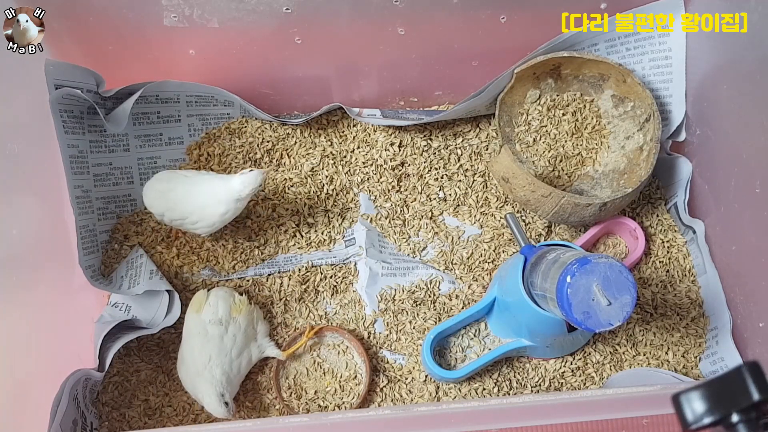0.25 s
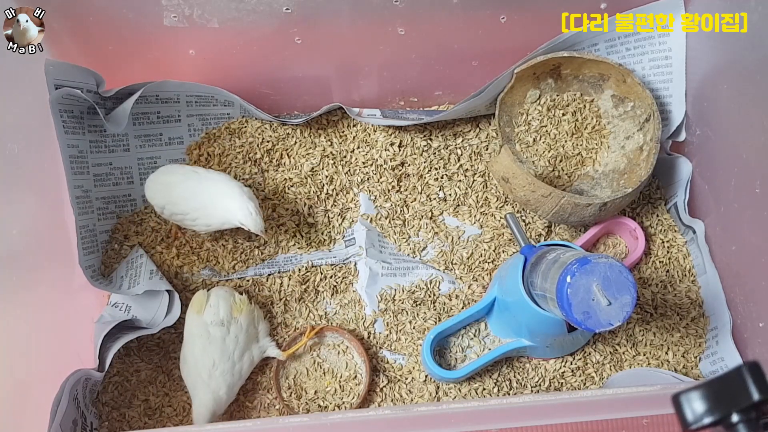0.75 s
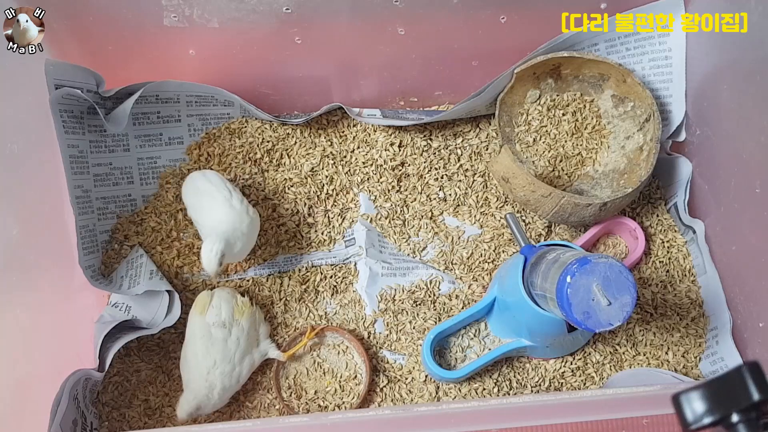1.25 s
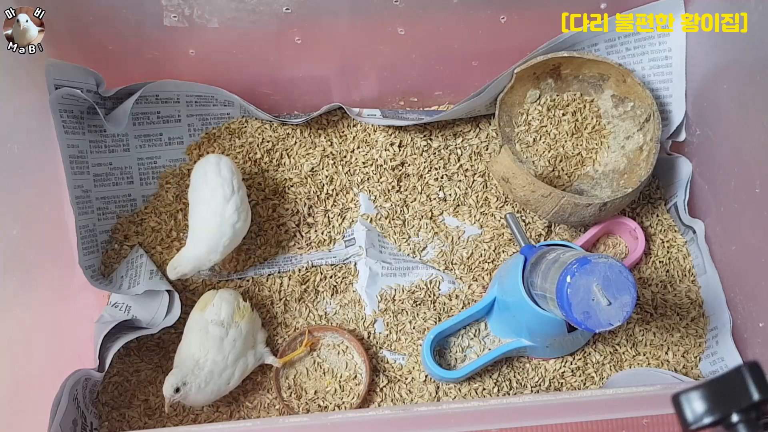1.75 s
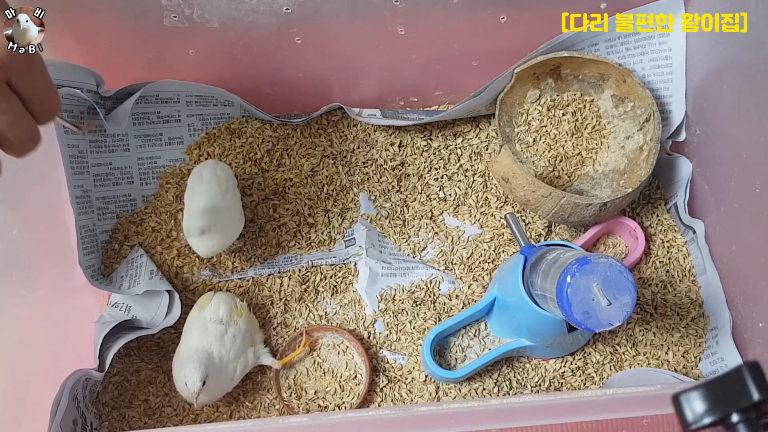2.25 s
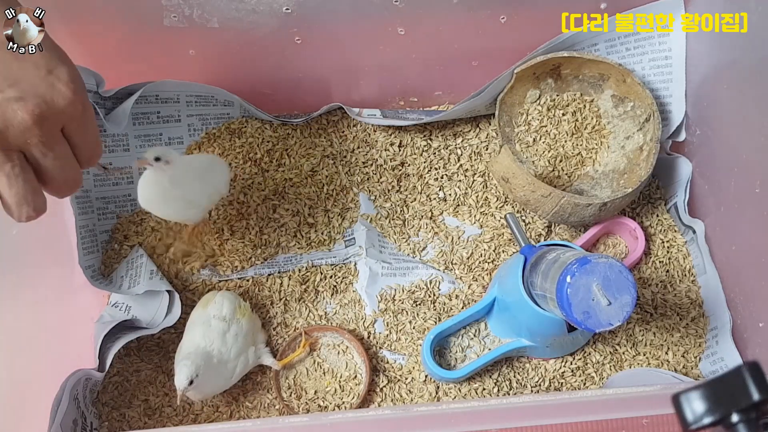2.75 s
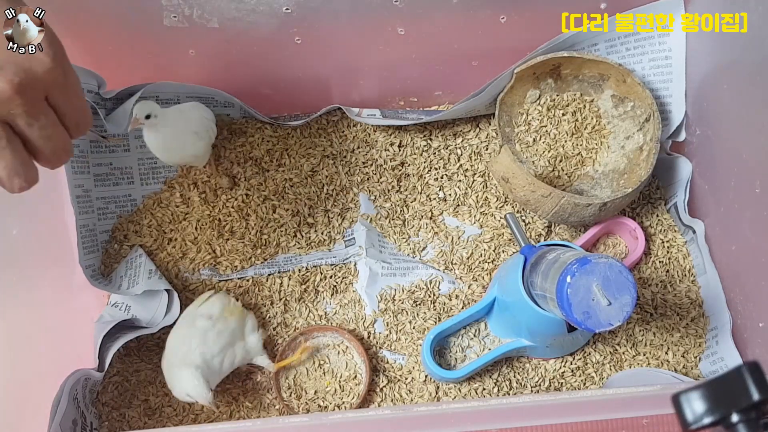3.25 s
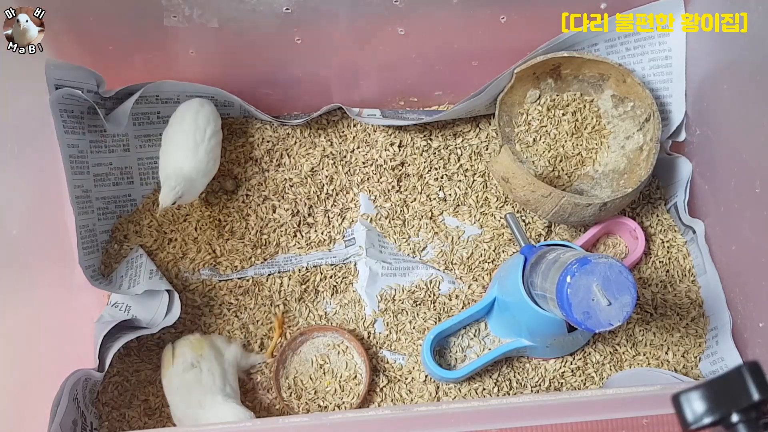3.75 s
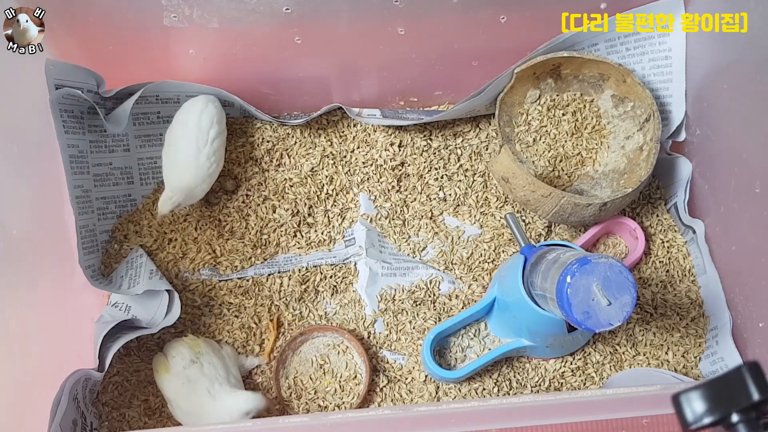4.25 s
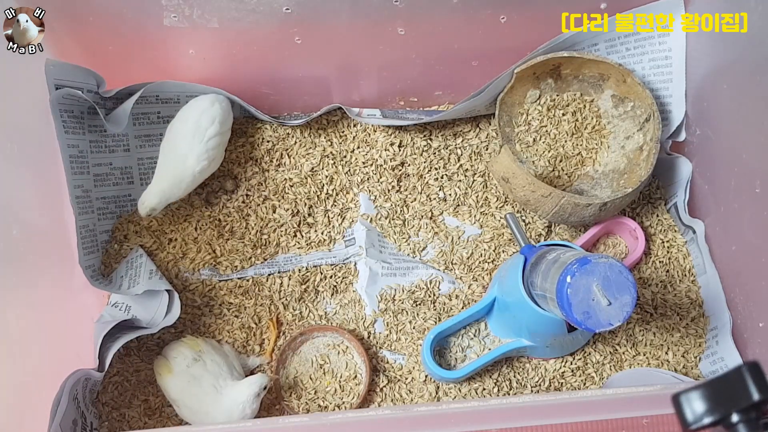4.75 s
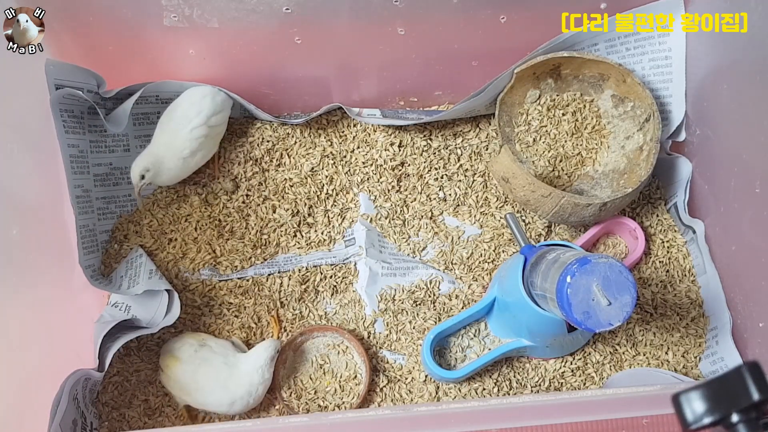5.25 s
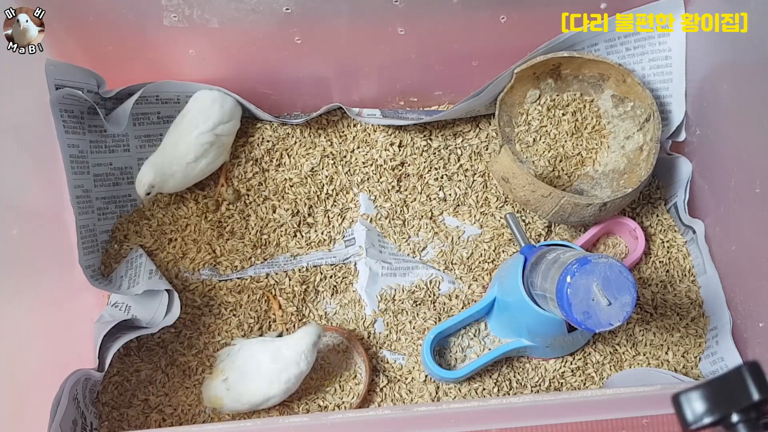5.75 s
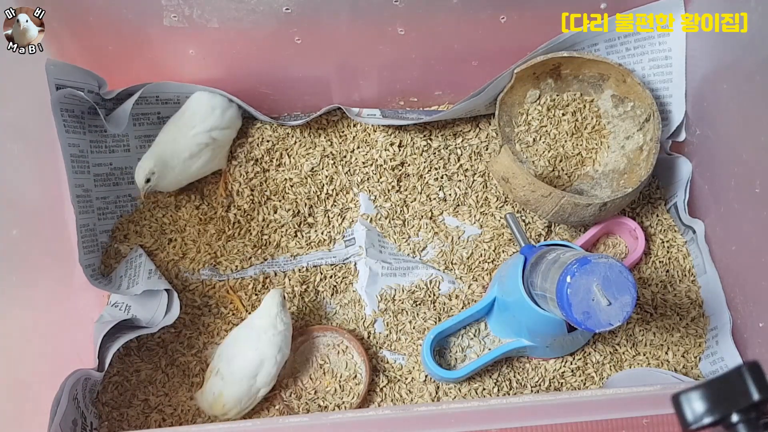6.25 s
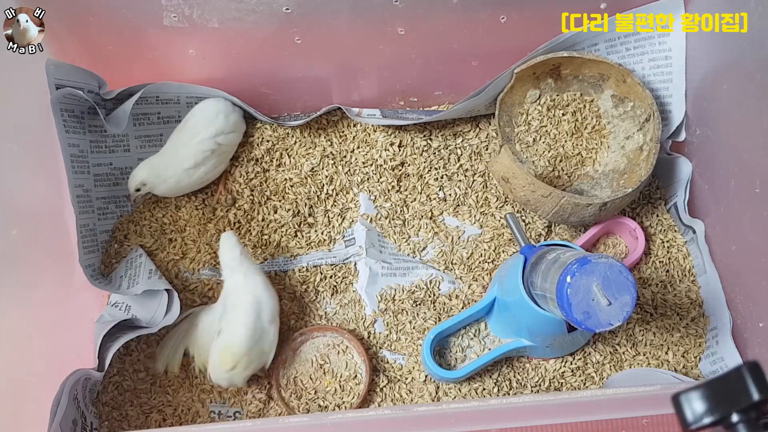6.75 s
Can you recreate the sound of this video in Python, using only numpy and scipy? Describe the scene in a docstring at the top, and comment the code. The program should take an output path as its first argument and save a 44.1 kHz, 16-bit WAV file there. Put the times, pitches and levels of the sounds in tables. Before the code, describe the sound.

In a small room, two motors hum with a quick low throb under rumble and soft hiss, while distant birds peep and twitter. Two quails in a husk-lined plastic tub first step lightly, then scratch hard around three seconds. After a lull with soft chirp-and-low-note calls, shorter scratching follows near five seconds and the strongest knocks near six. Close stereo pickup from above, slightly left.

```python
"""Two quails step and scratch in husks spread on newspaper in a plastic tub, heard from above in a small room.
Throughout, two motors hum and beat under rumble and hiss while far birds peep and twitter (gliding sines).
Light steps crackle from 0.2 s; soft two-part calls (chirp, then low note) come from 1.6 s, mostly after 3.4 s.
Bursts of scratching follow near 2.8-3.5, 4.8-5.4 and 5.9-7 s: random snaps for the husks, and for claws
that reach the paper, knocks that ring the modes of the tub floor."""
import sys
import numpy as np
from scipy import signal
from scipy.fft import rfft, irfft
from scipy.io import wavfile

SR = 44100
rng = np.random.default_rng(int(sys.argv[2]) if len(sys.argv) > 2 else 0)


def digitize_waveform(pressure):
    """Quantize a signal to 16-bit integers and store it at the path in sys.argv[1].

    Rows of a 2-D input are taken as channels; values are limited to [-1, 1].
    """
    field = np.atleast_2d(pressure).T
    bounded = np.clip(field, -1, 1)
    quanta = np.round(bounded * 32767).astype(np.int16)
    wavfile.write(sys.argv[1], SR, quanta)


N = 308700
TIME_S = np.arange(N) / SR


def amp(db):
    """Decibels to gain."""
    return 10 ** (np.asarray(db) / 20)


def evened(x):
    """Scales to rms 1."""
    return x / np.sqrt(np.mean(x ** 2) + 1e-20)


def read(points, hz):
    """Reads a spectrum on a log-frequency axis."""
    f, value = np.transpose(points)
    return np.interp(np.log(hz + 1), np.log(f + 1), value)


def level_curve(points):
    """Gain over time from (time [s], level [dB]) points."""
    return amp(np.interp(TIME_S, *np.transpose(points)))


def add(mix, start_s, sound):
    """Mixes a sound in at start_s."""
    part = mix[max(round(start_s * SR), 0):][:len(sound)]
    part += sound[:len(part)]


def wander(hz):
    """Low-passed noise of rms 1, up to about hz changes a second."""
    f = np.fft.rfftfreq(N, 1 / SR)
    lowpass = 1 / (1 + (f / hz) ** 2) ** 2
    return evened(irfft(rfft(rng.standard_normal(N)) * lowpass, N))


def panned(x, left_db):
    """Tips a stereo pair to the left."""
    return x * amp([[left_db / 2], [-left_db / 2]])


def click(colour, size=2048):
    """Minimum-phase click with this spectrum, energy 1."""
    hz = abs(np.fft.fftfreq(size, 1 / SR))
    log_gain = np.log(amp(read(colour, hz)))
    min_phase = np.exp(np.conj(signal.hilbert(log_gain)))
    h = np.fft.ifft(min_phase).real[:size // 2]
    return h / np.linalg.norm(h)


def echoes(t60_s, size=20000):
    """Sparse reflections, different at each microphone, dying away; energy 1."""
    t = np.arange(size) / SR
    sparse = rng.random((2, size)) < .1
    taps = rng.standard_normal((2, size)) * sparse * (t > .001)
    taps = taps * amp(-60 * t / t60_s)
    return taps / np.linalg.norm(taps, axis=1, keepdims=True)


def enclosure(x, walls_db, walls_t60_s, room_db, room_t60_s, right_lag_samples=6):
    """Direct sound, late at the right microphone, then reflections of the tub walls and the room."""
    h = amp(walls_db) * echoes(walls_t60_s) + amp(room_db) * echoes(room_t60_s)
    h[0, 0] = h[1, right_lag_samples] = 1
    return signal.oaconvolve(x[None], h / np.linalg.norm(h[0]), axes=1)[:, :N]


def whistle(length_s, pitches_hz, waver=0.025, flutter_db=2.0):
    """Near-sine of rms 1 gliding through the pitches, a little unsteady in pitch and strength."""
    u = np.linspace(0, 1, int(length_s * SR))
    knots = np.linspace(0, 1, 20)
    shake, flutter = (np.interp(u, knots, row) for row in rng.standard_normal((2, 20)))
    hz = np.interp(u, np.linspace(0, 1, len(pitches_hz)), pitches_hz) * (1 + waver * shake)
    tone = np.sin(2 * np.pi * np.cumsum(hz) / SR)
    return evened(tone * amp(flutter_db * flutter) * signal.windows.tukey(len(u), .4))


# rumble density before modes and swell: (frequency [Hz], level [dB per Hz])
RUMBLE = [(25, -96), (39, -100), (52, -77.5), (63, -90), (77, -74), (98, -88.5), (135, -88), (200, -87.5),
          (250, -83.5), (350, -88), (480, -92.5), (1000, -101), (1700, -118)]
# low room resonances: (centre [Hz], boost [dB])
ROOM_MODES = [(161, 9.5), (236, 5), (295, 5.5), (360, 10)]
# left-right likeness of rumble: (frequency [Hz], likeness [-1..1])
LIKENESS = [(70, 0.99), (130, 0.78), (290, 0.92), (640, 0.52), (1400, 0.081)]
# deep-bass gain: (time [s], level [dB])
SWELL = [(0, 9.5), (1.15, 11), (1.45, 3.5), (4.9, 8), (5.55, 10.5), (6.4, 10), (7, 1.5)]
# hiss density: (frequency [Hz], level [dB per Hz])
HISS = [(300, -112), (1100, -100.5), (1700, -109), (2200, -107), (2800, -102), (3800, -102.7),
        (5200, -101.3), (6800, -104), (8400, -100), (10500, -103), (12500, -103.5), (16000, -108.5)]


def room_air():
    """Fan rumble, coloured by room modes and swelling in the deep bass, under a diffuse hiss."""
    hz = np.fft.rfftfreq(N, 1 / SR)
    # white spectra at 0 dB per Hz
    shared, apart, hiss_l, hiss_r = rfft(rng.standard_normal((4, N))) * np.sqrt(SR / 2)
    same = np.clip(read(LIKENESS, hz), -1, 1)
    modes_db = sum(db / (1 + ((hz - centre_hz) / 7) ** 2) for centre_hz, db in ROOM_MODES)
    pair = np.array([shared, same * shared + np.sqrt(1 - same ** 2) * apart])
    fan = pair * amp(read(RUMBLE, hz) + modes_db)
    deep = 1 / (1 + (hz / 105) ** 6)
    rumble = irfft(fan * (1 - deep), N) + irfft(fan * deep, N) * level_curve(SWELL)
    hiss = irfft(np.array([hiss_l, hiss_r]) * amp(read(HISS, hz)), N)
    return panned(rumble, left_db=2.5) + hiss


MOTOR_HZ, BEAT_HZ, TOGETHER_S = 79.61, 4.385, 2.634  # faster motor; beat rate; a moment of peak
MOTOR_DB, SLOW_MOTOR_DB = -50, -56  # rms
# mains hum: (frequency [Hz], rms level [dB])
MAINS = [(120, -68)]


def hum():
    """Two motors of nearly equal speed beat over a faint mains hum."""
    slow_phase = np.exp(-2j * np.pi * BEAT_HZ * (TIME_S - TOGETHER_S))
    beat = amp(MOTOR_DB) + amp(SLOW_MOTOR_DB) * slow_phase
    motors = (beat * np.exp(2j * np.pi * (MOTOR_HZ * TIME_S + rng.random()))).real
    mains = sum(amp(db) * np.sin(2 * np.pi * (hz * TIME_S + rng.random())) for hz, db in MAINS)
    return np.sqrt(2) * (motors + mains)


# quick chirps: (time [s], length [s], start [Hz], end [Hz], level [dB])
CHIRPS = [(0.721, .026, 2550, 4000, -64), (0.756, 0.037, 3810, 2270, -61), (2.214, .031, 2900, 4250, -55),
          (2.217, 0.029, 4200, 4150, -56), (2.67, 0.074, 3120, 2410, -67)]
# near-level peeps: (time [s], length [s], pitch [Hz], level [dB])
PEEPS = [(0.021, 0.054, 2593, -63), (0.328, .08, 2540, -69), (0.611, .045, 2570, -64),
         (0.661, 0.072, 2520, -66), (0.615, 0.16, 3950, -72), (0.792, 0.083, 3020, -72),
         (0.908, 0.078, 2230, -65), (1.0, 0.058, 2550, -71), (1.18, 0.056, 2200, -67),
         (1.421, 0.036, 3130, -65), (1.45, 0.054, 2580, -68), (1.539, 0.14, 2185, -65),
         (1.896, 0.081, 3140, -72), (2.26, 0.081, 2444, -66), (2.336, 0.058, 2140, -67),
         (2.426, 0.054, 2200, -63), (2.497, 0.047, 3140, -66), (4.43, 0.043, 2520, -66),
         (4.648, .05, 2125, -67), (5.6, 0.063, 2670, -66), (5.592, .07, 3120, -68),
         (5.696, 0.054, 2445, -69), (5.849, 0.044, 2660, -70.5), (6.452, 0.027, 2680, -69)]
# flock twitter: (time [s], level [dB])
FLOCK = [(0, -75.5), (1.5, -66), (4.1, -72.5), (4.4, -76.5), (5.6, -64)]


def far_birds(count=420):
    """Short falling notes of a flock, mostly by way of the room; peeps and nearer chirps stand out."""
    near, peeps, flock = np.zeros((3, N))
    u = np.linspace(0, 1, 20)
    for s, length_s, start_hz, end_hz, db in CHIRPS:
        bend = u ** 3 if end_hz > start_hz else 1 - (1 - u) ** 2  # lingers at the low end
        add(near, s, amp(db) * whistle(length_s, start_hz + (end_hz - start_hz) * bend))
    for s, length_s, hz, db in PEEPS:
        add(peeps, s, amp(db) * whistle(length_s, [hz, hz], waver=0.036))
    for when, pitch, length, size in rng.random((count, 4)):
        fall_hz = 2500 * 1.38 ** pitch * np.array([1, 1, .88])
        note = whistle(.02 + .03 * length, fall_hz)
        add(flock, when * N / SR, amp(5 * size - pitch) * note)
    flock = evened(flock) * level_curve(FLOCK)
    heard = enclosure(near, walls_db=-8, walls_t60_s=.03, room_db=-7, room_t60_s=.25, right_lag_samples=3)
    heard += enclosure(peeps, walls_db=-2, walls_t60_s=.05, room_db=-1, room_t60_s=.3, right_lag_samples=3)
    heard += enclosure(flock, walls_db=0, walls_t60_s=.08, room_db=8, room_t60_s=.35, right_lag_samples=2)
    return panned(heard, left_db=0.5)


# contact calls: (time [s], chirp level [dB], low note level [dB], low note delay [s], low note pitch [Hz])
CONTACT_CALLS = [(1.563, -59, -67.5, 0.034, 970), (3.444, -54.5, -56, 0.05, 1047),
                 (3.974, -59.5, -56, 0.043, 1010), (4.208, -57, -65, 0.05, 900),
                 (4.702, -62, -81, .042, 900), (4.883, -55.5, -63, 0.053, 920),
                 (5.062, -53, -55.5, 0.052, 900), (5.661, -60.5, -61, 0.05, 854),
                 (5.91, -56.5, -54, 0.054, 900), (6.321, -51, -54.5, .054, 910)]


def quail_calls():
    """A quick shaky falling chirp; the voice then breaks downward and settles on a low note."""
    chirp_s, break_after_s, break_s, note_s = 0.027, .028, 0.019, 0.033
    chirp_hz = np.array([4120, 3900, 3400, 2700])
    note_bend = np.array([1, 1.01, 1, .99, .92])
    voice = np.zeros(N)
    for s, chirp_db, note_db, note_after_s, note_hz in CONTACT_CALLS:
        stretch, pitch = 1 + rng.uniform(-1, 1, 2) * [.18, .035]
        chirp = whistle(chirp_s * stretch, pitch * chirp_hz, waver=.035)
        voice_break = whistle(break_s, [1180, 1020, 940], waver=.02)
        note = whistle(note_s, note_hz * note_bend, waver=.008)
        add(voice, s, amp(chirp_db) * chirp)
        add(voice, s + break_after_s, amp((chirp_db + note_db) / 2 - 1) * voice_break)
        add(voice, s + note_after_s, amp(note_db) * note)
    heard = enclosure(voice, walls_db=-6, walls_t60_s=0.025, room_db=-9, room_t60_s=0.24, right_lag_samples=4)
    return panned(heard, left_db=5)


def grains(per_s, spread_db):
    """Random tiny snaps of uneven size, rms 1."""
    size = amp(spread_db * np.minimum(rng.exponential(1, N), 4))
    return evened(size * rng.choice([-1, 1], N) * (rng.random(N) < per_s / SR))


def crunch(decay_s, rest_db, swell, size=900):
    """A first snap sets off a quick run of smaller ones, building up by swell; rms 1 over 5 ms."""
    age = np.arange(size) / SR / decay_s
    sparse = rng.random(size) < .2
    run = rng.standard_normal(size) * sparse * age ** swell * np.exp(-age)
    run = amp(rest_db) * run / np.linalg.norm(run)
    run[0] = 1
    return run / np.linalg.norm(run) * np.sqrt(.005 * SR)


def scattered(snaps, count, clump_db, clump_hz):
    """Deals snaps out to several spots; each spot gives way in clumps of its own."""
    spot = rng.integers(0, count, N)
    clumps = [evened(amp(clump_db * wander(clump_hz))) for _ in range(count)]
    return np.array([snaps * (spot == k) * clump for k, clump in enumerate(clumps)])


PRESS_S, RELEASE_S = 0.0024, 0.039
TRICKLE_S, TRICKLE_DB = 0.098, -4.5  # a few husks trickle on after the foot stops
# steps and scratches: (time [s], push length [s], husk level [dB], paper level [dB])
SCUFFS = [(0.176, 0.026, -54, -89), (0.859, 0.092, -59, -63), (1.03, 0.024, -57, -78),
          (1.128, 0.045, -55.5, -70), (1.31, 0.075, -59.5, -69), (1.801, 0.032, -47.5, -65),
          (2.45, 0.022, -55.5, -76), (2.558, 0.051, -49, -65.5), (2.65, .05, -51.5, -68),
          (2.762, 0.035, -37, -48.5), (2.83, 0.043, -52, -54.5), (2.91, 0.017, -37, -43),
          (3.049, 0.021, -41, -43.5), (3.116, 0.097, -43.5, -45.5), (3.223, 0.094, -45, -49),
          (3.397, 0.017, -42, -46.5), (3.676, 0.0048, -48, -53), (3.725, 0.01, -48, -54.5),
          (3.88, 0.026, -58.5, -87), (4.749, 0.0097, -49.5, -52.5), (4.834, 0.03, -62, -51),
          (4.952, 0.039, -54.5, -51.5), (5.145, 0.085, -49.5, -49.5), (5.27, 0.092, -49, -56.5),
          (5.341, 0.11, -46.5, -52.5), (5.418, 0.064, -49, -50), (5.855, 0.2, -53, -62),
          (5.973, 0.046, -40.5, -42), (6.082, 0.047, -42.5, -60), (6.124, 0.036, -44, -46.5),
          (6.198, 0.098, -46.5, -46.5), (6.501, 0.11, -56, -65), (6.597, 0.022, -44.5, -50),
          (6.66, 0.2, -54, -61), (6.823, 0.051, -47, -49.5), (6.883, 0.036, -43, -45.5),
          (6.945, 0.06, -49.5, -67)]


def stirring(levels_db, rest_db):
    """Foot effort: each scuff presses in, holds and settles, over bedding that never quite rests."""
    power = np.full(N, amp(rest_db) ** 2)
    t = np.arange(SR // 2) / SR
    for (s, length_s, _, _), db in zip(SCUFFS, levels_db):
        after_s = np.maximum(t - length_s, 0)
        trickle = amp(TRICKLE_DB) * np.exp(-after_s / TRICKLE_S)
        settle = np.maximum(np.exp(-after_s / RELEASE_S), trickle)
        press = np.minimum(t / PRESS_S, 1)
        add(power, s, (amp(db) * press * settle) ** 2)
    return np.sqrt(power)


# husk snap colour: (frequency [Hz], relative level [dB])
HUSK = [(100, -38.5), (250, -4.5), (420, 1.5), (750, -5.5), (1500, -10.5), (2400, -4.5), (4300, 0),
        (5500, -3), (6800, -5.5), (8300, -0.3), (10000, -2), (12500, -1.5), (16000, -8.5)]
# pecks, claw strikes, footfalls: (time [s], husk level [dB], tub floor level [dB], favoured pitch [Hz])
STRIKES = [(0.182, -45, -78, 1400), (1.131, -47, -78, 1400), (1.811, -39.5, -85, 1400),
           (2.761, -33.5, -60, 1400), (2.7729, -36, -53, 503), (2.792, -31, -59, 1400),
           (2.911, -32.5, -45, 1390), (2.917, -33.5, -34, 1180), (2.942, -37, -48, 1100),
           (3.016, -42, -41, 1120), (3.117, -37.5, -46, 1200), (3.1217, -40, -41, 1100),
           (3.167, -33.5, -51, 1400), (3.1963, -28, -32, 1410), (3.2005, -43, -34, 1500),
           (3.233, -44, -37.5, 1150), (3.281, -51, -36.5, 1300), (3.4034, -41.5, -42, 1300),
           (3.5, -45, -58, 1400), (3.585, -47.5, -60, 1400), (3.744, -40.5, -48, 1400),
           (4.2061, -51, -56, 1500), (4.754, -44, -68, 1400), (4.8276, -34.5, -36.5, 1140),
           (4.9536, -53, -50, 1400), (4.979, -42, -41.5, 900), (4.992, -43, -42.5, 1090),
           (5.433, -40.5, -41.5, 1610), (5.444, -42, -48, 1000), (5.981, -46, -34, 1380),
           (5.99, -37.5, -33, 855), (6.028, -56, -35.5, 990), (6.1325, -44, -49, 1500),
           (6.2097, -36, -28.5, 1490), (6.2205, -54, -26.5, 1240), (6.316, -46, -49, 1400),
           (6.604, -42, -56, 1500), (6.829, -49, -55, 1400), (6.889, -39, -35.5, 1650),
           (6.943, -46, -39, 480)]


def husks(count=8):
    """Dry husks snap in clumps under the feet, at several spots in the tub."""
    unlike_db = 3.5
    stir = stirring([husk_db for _, _, husk_db, _ in SCUFFS], rest_db=-64.5)
    spots = scattered(stir * grains(per_s=1500, spread_db=3.3), count, clump_db=3.2, clump_hz=50)
    for k, (s, husk_db, _, _) in enumerate(STRIKES):
        add(spots[k % count], s, amp(husk_db) * crunch(decay_s=.0022, rest_db=8, swell=.6))
    heard = 0
    for k, x in enumerate(spots):
        # each spot has its own colour
        own = [(hz, db + unlike_db * rng.standard_normal()) for hz, db in HUSK]
        dry = signal.oaconvolve(x, click(own))[:N]
        heard += enclosure(dry, walls_db=2.5, walls_t60_s=.016, room_db=-2, room_t60_s=.21,
                           right_lag_samples=4 + k // 2)
    return panned(heard, left_db=2.5)


# paper snap colour: (frequency [Hz], relative level [dB])
PAPER = [(100, -11), (250, -33), (400, -11), (520, -9.5), (640, -3), (800, -7), (1050, 6.5), (1350, -4),
         (1650, 6.5), (2100, -0.5), (3000, -1), (6000, -8), (16000, -91)]
# tub modes before focus and detune: (frequency [Hz], relative level [dB], t60 [s])
TUB = [(480, 13, 0.017), (900, 0.5, 0.044), (1069, 12.5, 0.037), (1384, 16, 0.033), (1500, 16, 0.026),
       (1590, 13, 0.05), (1775, 5, 0.097), (2190, 26, 0.022)]
FOCUS_DB_PER_OCTAVE, RING_DB = 33.5, -0.5  # fall-off away from the favoured pitch; ring re paper snap


def floor_knock(focus_hz, snap):
    """Paper snaps and the tub modes near focus_hz ring most, slightly detuned each time; energy 1."""
    t = np.arange(SR // 5) / SR
    detune = 1 + .02 * rng.standard_normal()
    ring = np.zeros(len(t))
    for hz, db, t60_s in TUB:
        focus_db = -FOCUS_DB_PER_OCTAVE * abs(np.log2(hz / focus_hz))
        ring += amp(db + focus_db - 60 * t / t60_s) * np.sin(2 * np.pi * hz * detune * t)
    body = amp(RING_DB) * ring / np.linalg.norm(ring)
    paper = np.convolve(snap, click(PAPER))
    add(body, 0, paper / np.linalg.norm(paper))
    return body / np.linalg.norm(body)


# one scrape place each: favoured pitch [Hz]
SCRAPE_HZ = [900, 1300, 1500, 1760]


def tub_floor():
    """Claws scrape and knock the paper; the plastic under it rings briefly, differently at each place."""
    stir = stirring([paper_db for _, _, _, paper_db in SCUFFS], rest_db=-87)
    snaps = stir * grains(per_s=1200, spread_db=2)
    spots = scattered(snaps, len(SCRAPE_HZ), clump_db=3.5, clump_hz=50)
    heard = 0
    for x, hz in zip(spots, SCRAPE_HZ):
        scrape = signal.oaconvolve(x, floor_knock(hz, np.ones(1)))[:N]
        heard += enclosure(scrape, walls_db=-6, walls_t60_s=.03, room_db=-8, room_t60_s=.27)
    knocks = np.zeros(N)
    for s, _, knock_db, hz in STRIKES:
        snap = crunch(decay_s=.0028, rest_db=7, swell=0)
        add(knocks, s, amp(knock_db) * np.linalg.norm(snap) * floor_knock(hz, snap))
    heard += enclosure(knocks, walls_db=-9, walls_t60_s=.03, room_db=-10, room_t60_s=.27)
    return panned(heard, left_db=2.0)


def scene():
    """Birds and bedding in the humming room."""
    return room_air() + hum() + far_birds() + quail_calls() + husks() + tub_floor()


EDGE_HZ = 15950


def record(dry):
    """Linear-phase low-pass at EDGE_HZ."""
    lowpass = signal.firwin(511, EDGE_HZ, window=("kaiser", 9), fs=SR)
    return signal.oaconvolve(dry, lowpass[None], "same")


dry = scene()
out = record(dry)
digitize_waveform(out)
```